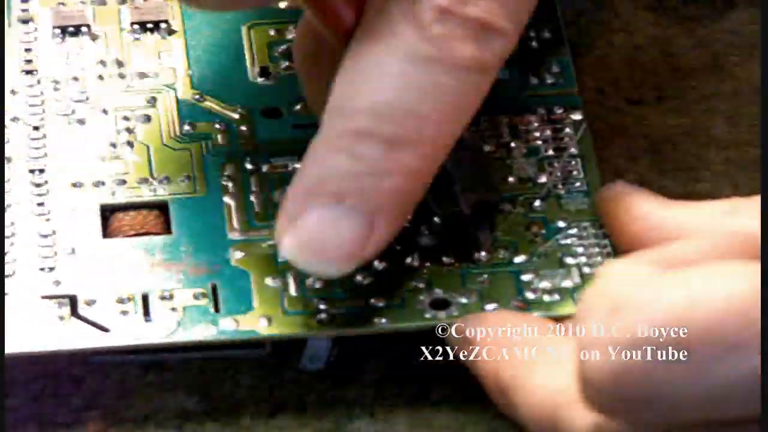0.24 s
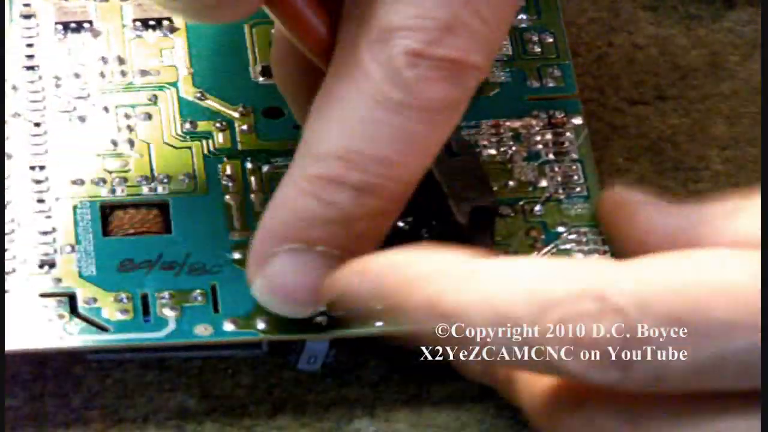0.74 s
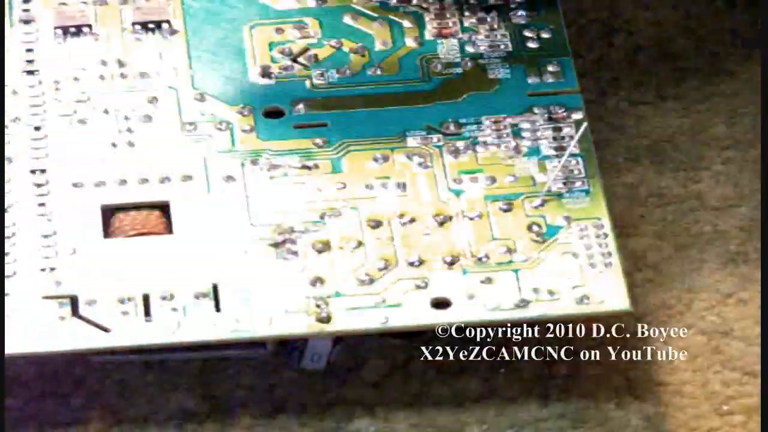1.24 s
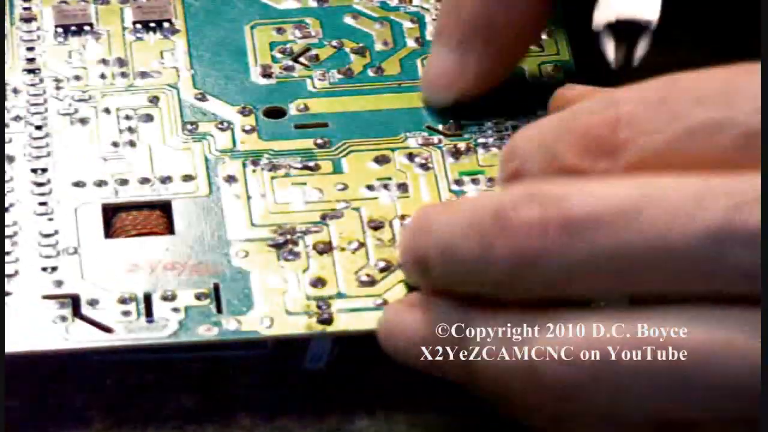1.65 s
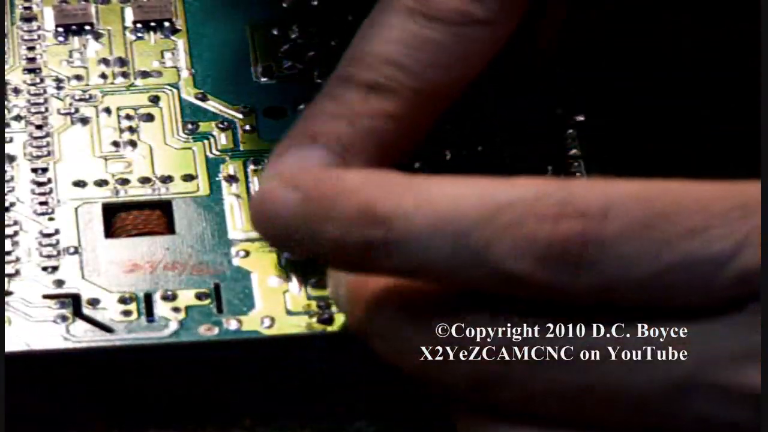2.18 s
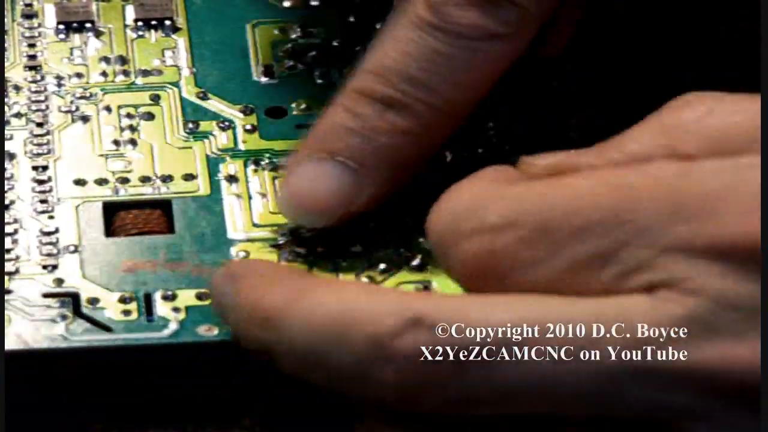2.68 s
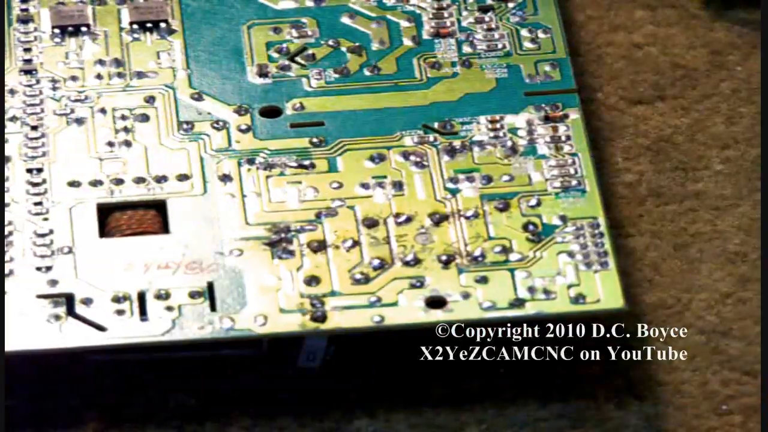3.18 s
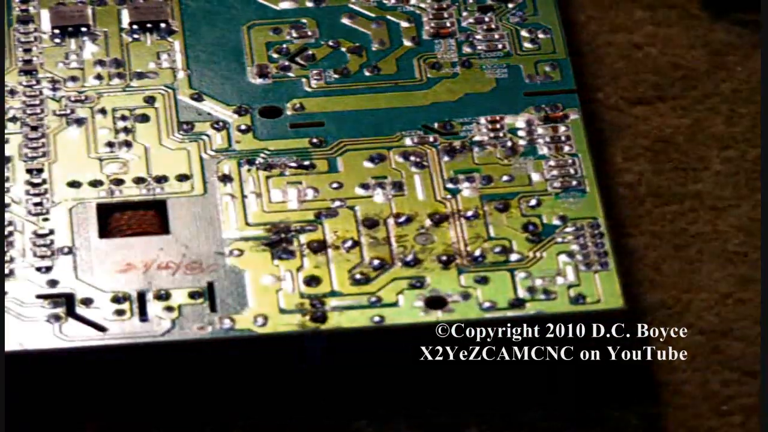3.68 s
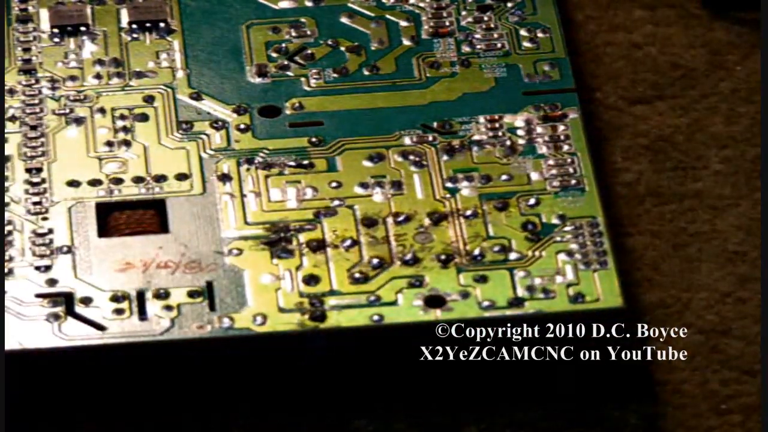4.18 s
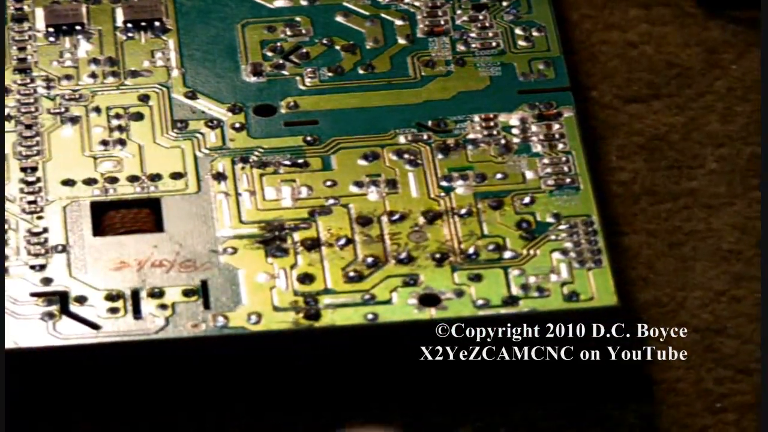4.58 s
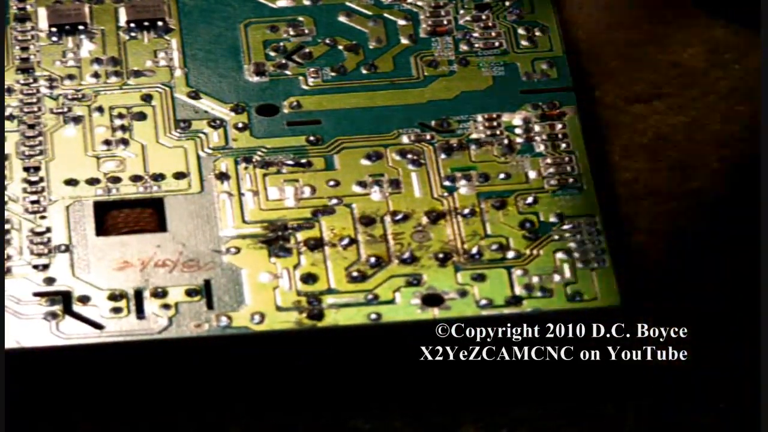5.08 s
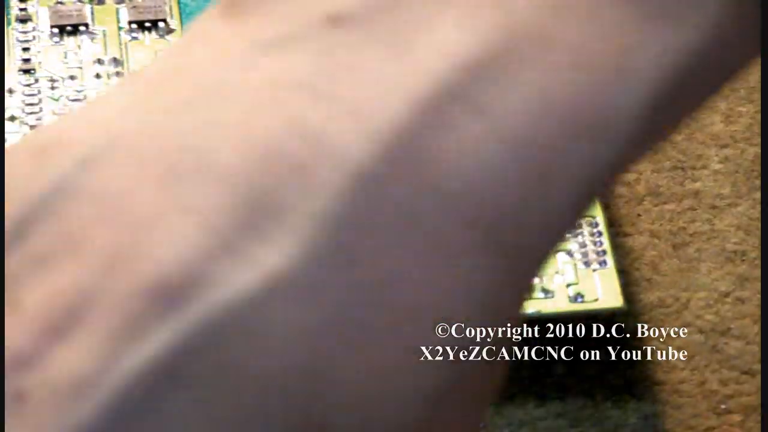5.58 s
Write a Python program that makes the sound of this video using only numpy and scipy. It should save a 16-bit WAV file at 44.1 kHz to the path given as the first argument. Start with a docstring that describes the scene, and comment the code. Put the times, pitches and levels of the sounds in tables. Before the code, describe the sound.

A constant, slightly wavering low hum and fan air run underneath. Over them come irregular dry tool sounds at a bench: faint taps, a hard snip, small clatters, a pause, another crisp snip, faint scrapes and ticks, then one snip that overloads the microphone, and finally quieter knocks and brushing. The small room adds only a brief tail; high treble is missing.

```python
"""Throughout, near-equal cooling fans and mains hum (harmonic stacks) beat over shaped air noise.
On a bench in a small workshop, small steel cutters snip wire leads and are knocked and set down from 0.1 s on:
each click is a snap, a crack, struck modes and a rattle; brief rubs are band-passed grains.
At 4.07 s the loudest snip overloads the recorder by hard clipping; smaller knocks and rubs follow."""
import sys
import numpy as np
from scipy import signal
from scipy.fft import rfft, irfft
from scipy.io import wavfile
from scipy.ndimage import uniform_filter1d

SR = 44100
rng = np.random.default_rng(int(sys.argv[2]) if len(sys.argv) > 2 else 0)


def wav_record(signal):
    """Record a signal, one row per channel, as 16-bit PCM in the file named by sys.argv[1]."""
    frames = np.transpose(np.atleast_2d(signal))
    bounded = np.clip(frames, -1, 1)
    # unit amplitude maps onto the largest positive 16-bit level
    quanta = np.round(bounded * 32767).astype(np.int16)
    wavfile.write(sys.argv[1], SR, quanta)


N = 257544

# Fans and mains. Each row: fundamental in Hz, time in seconds at which it is in step with the first fan,
# rms speed drift as a share.
SOURCES = [(54.717, 0, .0001), (55.2, 1.459, .0005), (55.79, .378, .0002), (53.77, .89, 0),
           (58.07, .248, 0), (60.01, .186, .00001), (63.24, .046, .001), (87.61, 0, .0002)]
# Harmonics, one list per source. Each row: order, level in dB rms.
HARMONICS = [
    [(1, -43), (2, -66), (3, -59), (4, -59.5), (7, -70.5), (13, -66), (14, -65.5), (27, -69.5)],
    [(1, -58.5), (3, -73.5), (4, -59.5), (5, -62.5), (6, -61.5), (7, -64), (8, -63), (10, -63.5), (11, -66),
     (14, -72), (15, -74), (16, -66.5), (17, -69.5), (18, -73.5), (23, -61), (24, -67.5), (25, -66.5),
     (27, -62), (28, -73), (29, -67.5)],
    [(1, -57), (2, -66), (4, -70.5)],
    [(1, -61.5)],
    [(1, -65.5)],
    [(1, -56), (2, -69), (3, -64), (6, -62.5), (8, -69.5), (17, -67.5), (19, -67.5), (35, -67.5), (49, -64),
     (67, -65.5), (71, -68.5), (73, -58), (79, -68.5)],
    [(1, -70.5), (7, -62.5), (14, -71)],
    [(1, -65), (2, -59), (4, -64.5), (13, -64.5)],
]
# Relative spectrum of the fans' air noise. Each row: frequency in Hz, level in dB.
AIR_SPECTRUM = [(15, -14), (33, 2.5), (80, -2), (150, -6), (320, 0.5), (520, -4), (900, -6.5), (1500, -7.5),
                (2000, -7), (2900, -7.5), (3900, -5), (4500, -11), (4900, -14), (7600, -22)]
# Decay of the room. Each row: frequency in Hz, t60 in seconds.
ROOM_DECAY = [(500, .25), (1500, 0.24), (3500, 0.19), (7000, 0.22)]
# Rubs of tool or fingers. Each row: start in seconds, length in seconds, rms level before fades in dB,
# centre in Hz, width in Hz.
RUBS = [(0.109, 0.059, -47, 3480, 900), (3.168, 0.11, -44.5, 3820, 800), (3.193, 0.057, -51, 2140, 500),
        (3.39, .04, -59, 5200, 900), (4.322, 0.032, -57, 5720, 700), (4.541, 0.24, -53.5, 3530, 2500),
        (5.056, 0.064, -47.5, 4200, 1500), (5.573, 0.055, -50.5, 4000, 1500)]
# Bench, circuit board and cutters ringing together. Each row: mode in Hz, relative level in dB, t60 in seconds.
BODY_MODES = [(480, -8, .04), (705, 4, 0.026), (920, 3, .05), (1057, 4.5, .05), (1150, -11.5, 0.1),
              (1280, -31, .05), (1506, 12, 0.023), (1877, 8, 0.058), (2096, 4.5, .05), (2330, -1.5, 0.029),
              (2640, 3, 0.043), (2890, -5, .05), (3210, 1.5, .06), (3320, 4, .05), (3560, -10, 0.06),
              (3600, -4, 0.056), (3745, 8, 0.037), (4096, 3, 0.077), (4370, 1, 0.024), (4500, 2.5, 0.026),
              (4930, -0.5, .05), (5070, -9, 0.043), (5420, -3.5, .05), (5820, -5.5, .05), (6040, -5, .05),
              (6300, -8.5, .04), (7040, -8, 0.054), (7700, -14.5, 0.034)]
# Clicks and knocks, levels before the mixing gains. Each row: start in seconds, snap level in dB, snap in Hz,
# snap t60 in seconds, ring level in dB, ring centre in Hz, spread in octaves, rattle t60 in seconds.
CLICKS = [(0.142, -38.5, 3430, .03, -49, 3000, 1.3, .1), (.562, -37, 3300, .008, -41.5, 2100, 1.3, .09),
          (0.693, -12, 3900, .009, -30, 4000, 1.05, .1), (.776, -49, 4000, .01, -55, 4500, 1.5, .06),
          (.822, -30, 4300, .008, -38.5, 2900, 1.6, .085),
          (1.073, -31.5, 5240, 0.011, -43, 5100, 0.38, .06),
          (2.648, -16, 4760, 0.012, -27.5, 1850, 1.18, 0.068), (3.099, -48, 4080, .02, -50, 2600, 1.1, .07),
          (3.213, -40, 2140, .02, -44, 3200, 1.6, 0.15), (3.744, -34, 3850, 0.03, -35.5, 3820, 0.36, .08),
          (3.777, -33, 3900, .02, -36.5, 3900, .4, .075), (3.806, -43, 2150, .09, -58, 3000, 1.5, .06),
          (4.072, 8, 3520, 0.0039, -16, 2640, 1.48, .12),
          (4.21, -24.5, 3760, 0.027, -36.5, 4200, 1.44, .09), (4.288, -44, 3120, .05, -51, 3600, .8, .05),
          (5.043, -29, 3370, 0.01, -38.5, 1500, 1.6, 0.1), (5.170, -35, 1800, .025, -34, 1700, 1.9, .08),
          (5.245, -40, 1550, 0.017, -44.5, 2400, 1.1, 0.13)]

AIR_RMS_DB, ROOM_DB = -46, -13.5
MIC_EDGE_HZ, TOP_HZ = 7500, 16300
SPREAD_DB = -10  # reach of a blow one spread away from its centre
CRACK_WIDER = 1.28  # spread of the crack over that of the ring
CRACK_DB, CRACK_T60_S = 14.5, 0.0068  # level over the ring
GRIT_DB = 3.5  # over the ring; dies with the rattle
QUICK_T60_S, TICK_T60_S, TICK_HZ = 0.011, 0.0035, 6400
CONTACT_S = 0.00066


def amp(db):
    """Converts dB to amplitude."""
    return 10 ** (np.asarray(db) / 20)


def evened(x):
    """Scales to rms 1."""
    return x / np.sqrt(np.mean(x ** 2) + 1e-20)


def read(points, hz):
    """Interpolates a table along log frequency."""
    f, value = np.transpose(points)
    return np.interp(np.log(hz + 1), np.log(f + 1), value)


def add(mix, start_s, sound):
    """Mixes a sound in at start_s."""
    part = mix[round(start_s * SR):][:len(sound)]
    part += sound[:len(part)]


def drift(t, top_hz, count=16):
    """Slow random wander of rms 1: sines of random phase, weaker towards top_hz."""
    wander = np.zeros(len(t))
    for hz in np.geomspace(top_hz / 20, top_hz, count):
        wander += np.sin(2 * np.pi * (hz * t + rng.random())) / np.sqrt(hz)
    return evened(wander)


def low_pass(x, hz):
    """Steep linear-phase band limit."""
    taps = signal.firwin(801, hz, window=("kaiser", 9), fs=SR)
    return signal.oaconvolve(x, taps[None], "same")


def hum():
    """Harmonic stacks of rotation and mains; near-equal fundamentals beat against the first fan."""
    t, out = np.arange(N) / SR, np.zeros(N)
    coarse_t = t[::400]
    first_hz = SOURCES[0][0]
    for (hz, in_step_s, drift_share), harmonics in zip(SOURCES, HARMONICS):
        wander = np.interp(t, coarse_t, drift(coarse_t, 3.03))
        slip = drift_share * hz * np.cumsum(wander) / SR
        turns = hz * (t - in_step_s) + first_hz * in_step_s + slip - slip.mean()
        for order, rms_db in harmonics:
            phase = rng.random() * (order > 1)  # fundamentals keep their step
            out += np.sqrt(2) * amp(rms_db) * np.sin(2 * np.pi * (order * turns + phase))
    return out


def air():
    """Turbulence as random short-time spectra, with faint drifting patches and a slow swell."""
    hop, size = 256, 1024
    frames, hz = N // hop + 5, np.fft.rfftfreq(size, 1 / SR)
    real, imag, patches = rng.standard_normal((frames, len(hz), 3)).T
    patches = uniform_filter1d(patches, size=10, axis=0)  # across frequency
    patches = evened(uniform_filter1d(patches, size=12, axis=1))  # across time
    swell = drift(np.arange(frames) * hop / SR, 3.7)
    level_db = read(AIR_SPECTRUM, hz)[:, None] + 0.88 * patches + 0.27 * swell
    spectra = (real + 1j * imag) * amp(level_db) * (hz < 8000)[:, None]
    noise = signal.istft(spectra, nperseg=size, noverlap=size - hop)[1][:N]
    return amp(AIR_RMS_DB) * evened(noise)


def room(x):
    """Room tail: sparse taps of random sign, each band dying at its own speed."""
    taps = np.zeros(SR // 2)
    at = np.arange(200, SR // 2 - 20, 20)
    taps[at + rng.integers(0, 20, len(at))] = rng.choice([-1., 1.], len(at))
    hz, t, spectra = signal.stft(taps, SR, nperseg=256)
    decay = amp(-60 * t / read(ROOM_DECAY, hz)[:, None])
    tail = signal.istft(spectra * decay, SR, nperseg=256)[1]
    return signal.fftconvolve(x, tail / np.linalg.norm(tail))[:N]


def rub(length_s, level_db, centre_hz, width_hz):
    """Friction as dense uneven grains through one broad resonance."""
    count = round(length_s * SR)
    grains = rng.standard_normal(count)
    unevenness = evened(uniform_filter1d(rng.standard_normal(count), size=120))
    grains = grains * amp(2.1 * unevenness)
    edges_hz = [centre_hz - width_hz / 2, centre_hz + width_hz / 2]
    resonance = signal.butter(2, edges_hz, "band", fs=SR, output="sos")
    rubbed = evened(signal.sosfilt(resonance, grains))
    return amp(level_db) * rubbed * signal.windows.tukey(count, .6)


def bell_db(hz, centre_hz, spread_oct):
    """How strongly a blow reaches each frequency: a bell on the octave scale."""
    return SPREAD_DB * (np.log2((hz + 1) / centre_hz) / spread_oct) ** 2


def click(snap_db, snap_hz, snap_t60_s, ring_db, centre_hz, spread_oct, rattle_t60_s):
    """A short snap, a dense crack and a blow on the modes, fed on by a dying rattle of rebounds."""
    t = np.arange(6000) / SR
    rise = 1 - np.exp(-(t / CONTACT_S) ** 2)  # the contact lasts a moment

    hz, mode_db, t60_s = np.transpose(BODY_MODES)[:, :, None]
    # each blow lands on another spot: level, tuning and sign vary
    level_draw, tuning_draw, sign_draw = rng.standard_normal((3, len(BODY_MODES), 1))
    mode_db = mode_db + ring_db + bell_db(hz, centre_hz, spread_oct) + 0.78 * level_draw
    waves = np.sign(sign_draw) * np.sin(2 * np.pi * hz * (1 + 0.0043 * tuning_draw) * t)
    quick = (amp(mode_db - 60 * t / QUICK_T60_S) * waves).sum(0) * rise  # fast early decay
    ring = (amp(mode_db - 60 * t / t60_s) * waves).sum(0) * rise

    snap = amp(snap_db - 60 * t / snap_t60_s) * np.sin(2 * np.pi * snap_hz * t) * rise
    # bright first touch of the edges
    tick = amp(snap_db - 60 * t / TICK_T60_S) * np.sin(2 * np.pi * TICK_HZ * t) * rise

    dying = amp(-60 * t / rattle_t60_s)
    hits = rng.standard_normal(len(t))
    rebounds = hits * (rng.random(len(t)) < 6000 / SR) * dying  # 6000 a second on average
    rebounds /= np.linalg.norm(rebounds)
    rattle = signal.fftconvolve(rebounds, quick + 0.32 * ring + 0.27 * snap)[:len(t)]

    reach = amp(bell_db(np.fft.rfftfreq(len(t), 1 / SR), centre_hz, CRACK_WIDER * spread_oct))
    crack = irfft(rfft(rng.standard_normal(len(t))) * reach, len(t)) * amp(ring_db) * rise
    crack *= amp(CRACK_DB - 60 * t / CRACK_T60_S) + amp(GRIT_DB) * dying
    return 1.39 * snap + .4 * tick + 0.31 * quick + 0.059 * ring + 1.11 * rattle + crack


def scene():
    """Bench sounds with their room tail over the fans."""
    bench = np.zeros(N)
    for start_s, *settings in RUBS:
        add(bench, start_s, rub(*settings))
    for start_s, *settings in CLICKS:
        add(bench, start_s, click(*settings))
    return (hum() + air() + amp(ROOM_DB) * room(bench) + bench)[None]


def record(dry):
    """Narrow-band microphone channel, hard overload at full scale, final band limit."""
    heard = low_pass(dry, MIC_EDGE_HZ)
    overloaded = np.clip(heard, -1, 1)
    return low_pass(overloaded, TOP_HZ)


dry = scene()
out = record(dry)
wav_record(out)
```